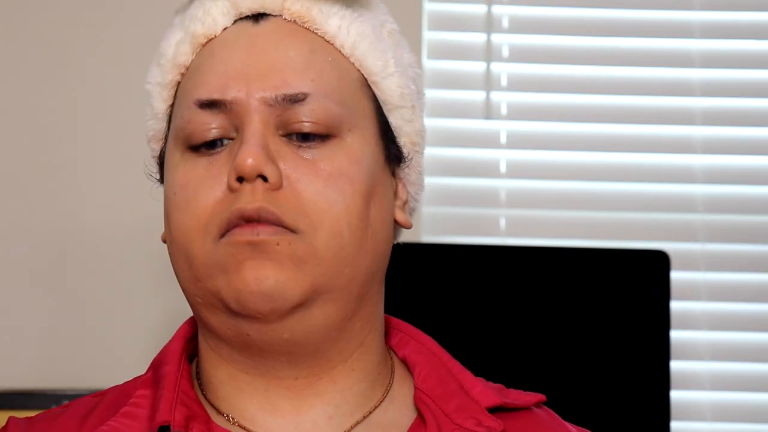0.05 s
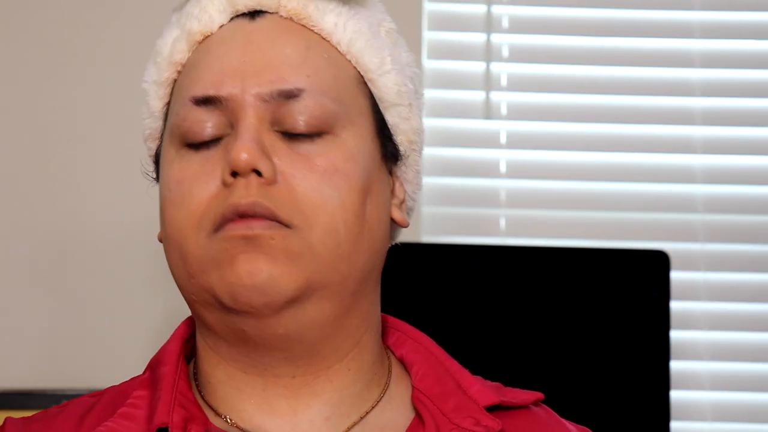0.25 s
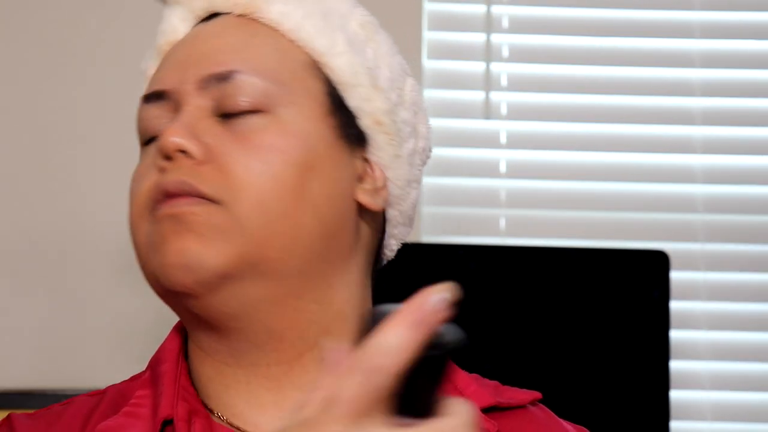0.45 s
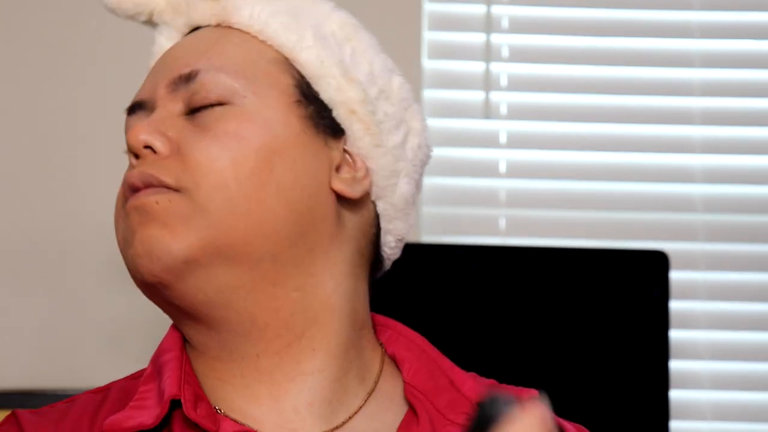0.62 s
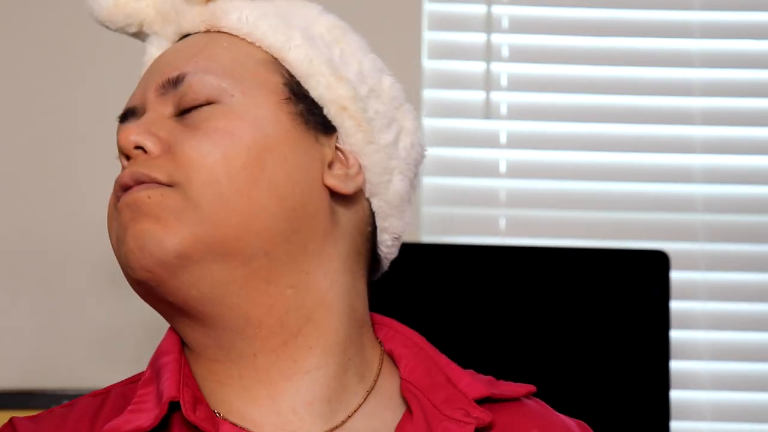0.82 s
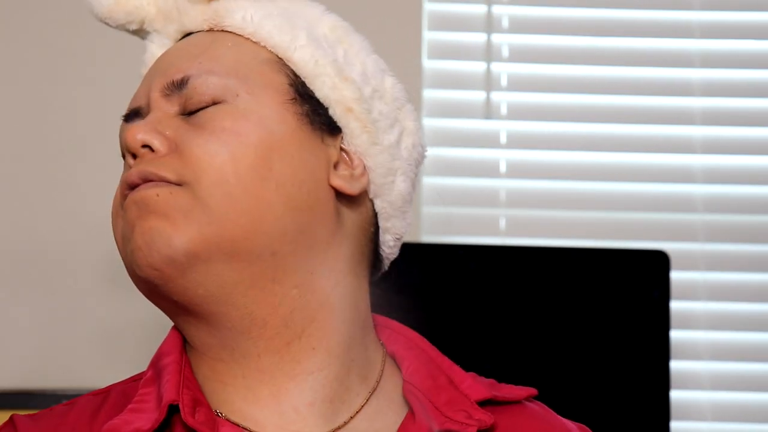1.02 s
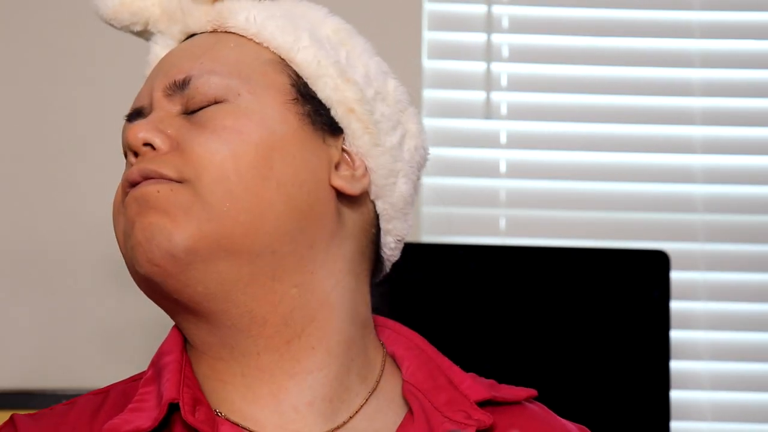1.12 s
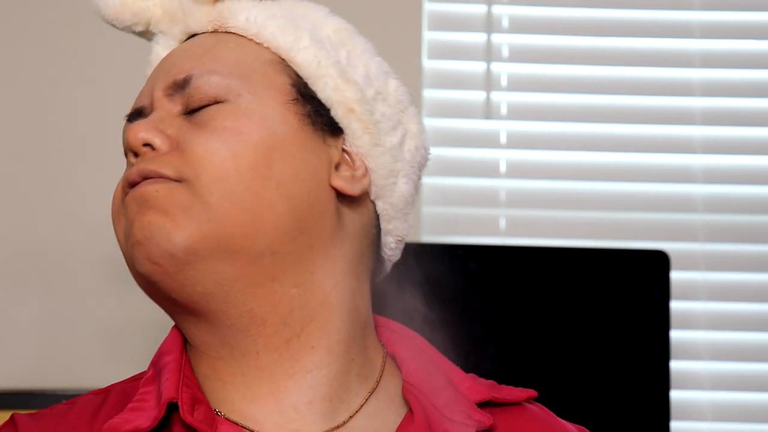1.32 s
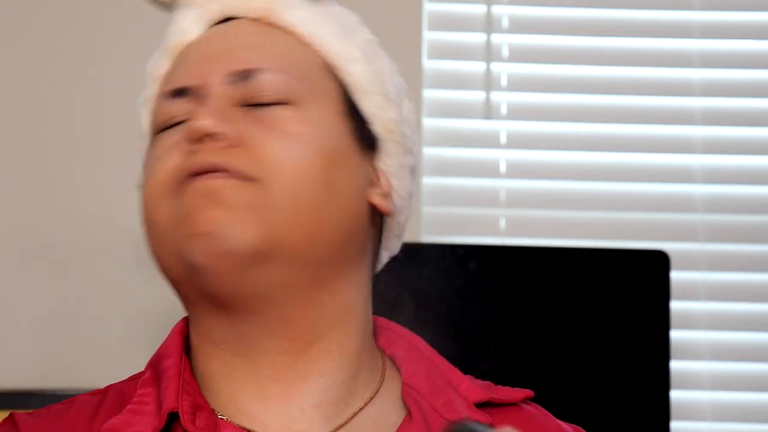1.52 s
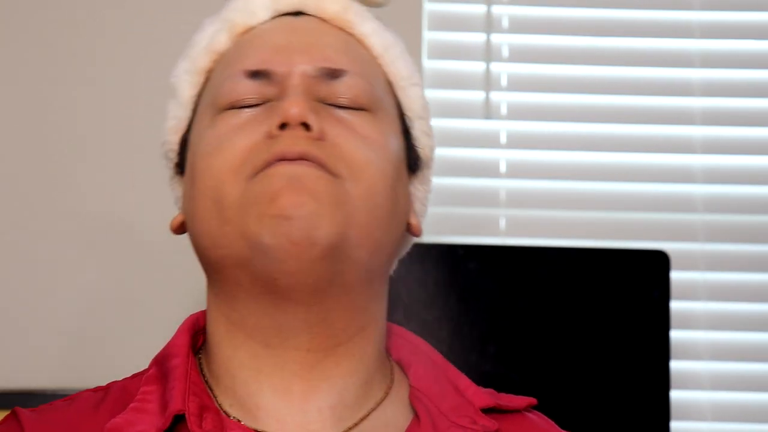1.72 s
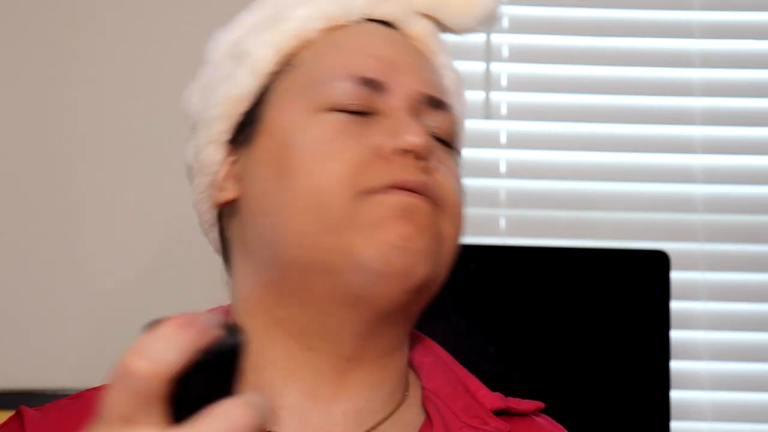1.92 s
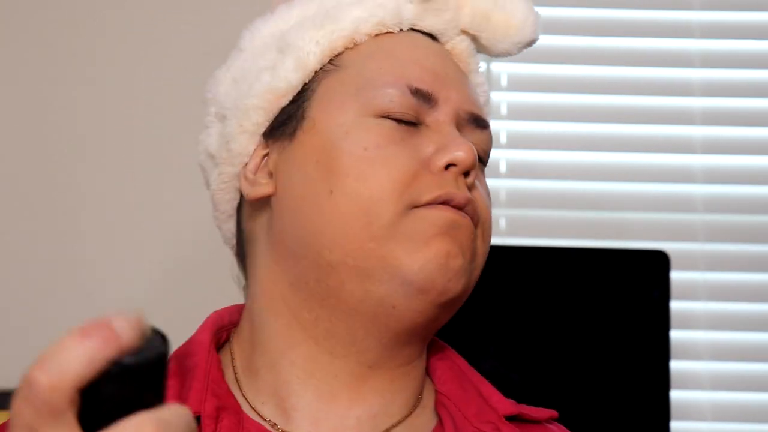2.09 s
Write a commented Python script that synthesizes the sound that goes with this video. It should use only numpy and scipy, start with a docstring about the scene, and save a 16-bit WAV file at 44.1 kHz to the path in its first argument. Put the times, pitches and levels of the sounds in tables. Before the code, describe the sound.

A plastic pump bottle sprays mist at close range in a small quiet room. Its cap pops off sharply at about 0.15 seconds, and light hollow knocks follow from 0.6 seconds. Four short hissing spritzes come at about 1.0, 1.3, 1.6 and 2.0 seconds, each starting with a pump click. Between them the bottle knocks and the liquid swishes softly, over a faint background hum.

```python
"""A plastic pump bottle sprays four times at close range in a small quiet room, after its cap snaps off.
Before each spray, knocks excite the hollow body's damped modes and the liquid swishes; the pump clicks
down, and turbulent flow through the nozzle hisses out as mist. The plastic ticks and squeaks faintly.
Near surfaces reflect the impacts within milliseconds; a faint hum and hiss lie underneath."""
import sys
import numpy as np
from scipy import signal
from scipy.fft import rfft, irfft, next_fast_len
from scipy.io import wavfile
from scipy.ndimage import map_coordinates

SR = 44100
rng = np.random.default_rng(int(sys.argv[2]) if len(sys.argv) > 2 else 0)


def generate_wav(signal):
    """Clip the signal to [-1, 1] and save it as 16-bit WAV at the path in sys.argv[1]."""
    frames = np.transpose(np.atleast_2d(signal))
    scaled = np.clip(frames, -1, 1) * 32767
    pcm = np.round(scaled).astype(np.int16)
    wavfile.write(sys.argv[1], SR, pcm)


N = 94815

# coherence of noise from the bottle, and of the diffuse field (frequency [Hz], left-right correlation [1])
NEAR_COHERENCE = [(500, 0.34), (3000, 0.65), (12000, 0.089)]
DIFFUSE_COHERENCE = [(300, 1), (800, 0.66), (2000, 0.1), (5000, 0.019)]


def mist():
    """Atomisation: the nozzle spits, then turbulent flow breaks up the liquid with a broadband hiss."""
    # bursts of flow (peak time [s], rise [s], fall [s], level [dB], treble tilt [dB/octave])
    puffs = [(1.065, 0.031, 0.06, -39.5, 4.5), (1.39, 0.037, .055, -34, 5),
             (1.712, 0.039, 0.046, -36.5, 4.5), (2.035, 0.046, 0.052, -38, 4.5)]
    spits = [(1.014, .003, 0.029, -37, -16), (1.337, 0.0032, 0.0098, -41, 2),
             (1.638, 0.0038, 0.0068, -47, -6), (1.957, .003, 0.0045, -53, 2)]
    # their spectra before the tilt (frequency [Hz], relative density [dB])
    puff_spectrum = [(200, -25), (500, 2), (1000, -2), (1500, -4), (2000, -1.5), (3060, 1.5), (4500, -1),
                     (6500, -3.5), (8000, -4), (10400, -8), (13000, -15.5), (16000, -21)]
    spit_spectrum = [(100, -61), (1000, -33.5), (5500, -13), (6600, 0), (7200, 2), (8200, -3), (9500, -8),
                     (16000, -28)]
    # coherence of the spray (frequency [Hz], left-right correlation [1])
    coherence = [(400, 0.59), (2400, 0.59), (6000, 0.48), (14000, 0.22)]
    # stereo balance of the spray (frequency [Hz], left over right [dB])
    balance = [(60, 0.5), (180, -1), (550, 4), (1650, -3.5), (4970, -0.5), (15000, 1)]
    hiss = swells(puffs, puff_spectrum, coherence, flutter_db=1.67, flutter_hz=300)
    hiss += swells(spits, spit_spectrum, NEAR_COHERENCE, flutter_db=-2, flutter_hz=500)
    return filtered(hiss, lambda hz: amp(along(balance, hz) / 2 * np.array([[1], [-1]])))


def bottle():
    """Impact excitation: knocks and pump strokes each give a thump, a click and a hollow modal ring."""
    # blows (time [s], gain [dB], thump frequency [Hz], click gain [dB], ring gain [dB], mode ratio [1])
    knocks = [(.6142, -39, 1230, 0, 2, 0.93), (.6892, -25, 750, -6, 1.5, .92),
              (.7524, -19.5, 820, -3.5, 0, 0.99), (.9179, -17, 844, 3.5, -1.5, 1.08),
              (.9471, -13.5, 737, -8, -7, 0.88), (1.1997, -17, 890, 8, 1.5, 0.97),
              (1.2367, -17, 704, -1, -16, 0.33), (1.3105, -31.5, 915, 13, 5, 1.2),
              (1.5441, -15.5, 896, 0, -0.5, 1), (1.5793, -17, 740, -24, 0, 0.87),
              (1.8275, -31, 1080, 5, 5.5, 1.27), (1.8341, -15.5, 827, -4, -6, 0.89),
              (1.8683, -16, 685, -1, -10, 0.33)]
    presses = [(1.0046, -17, 930, 7.5, 0, 0.92), (1.3159, -18, 860, 6.5, 3.5, 0.88),
               (1.6290, -21, 654, 10, 5, 0.86), (1.9482, -16, 524, 6.5, -1.5, 0.9)]
    # body modes, whose pitch shifts with the liquid (frequency [Hz], relative level [dB], T60 [s])
    modes = [(444, -44, 0.094), (546, -29, .07), (648.8, -17.5, 0.08), (711, -11, 0.034), (835, -33, 0.034),
             (1080, -30, 0.02), (1546, -18, 0.037), (3180, -23.5, 0.019)]
    t, out = hit_time(), np.zeros((2, N))
    low_cut = signal.butter(2, 280, "high", fs=SR, output="sos")
    attack = 1 - np.exp(-t / .0008)
    for blows, thump_t60 in ((knocks, .0081), (presses, .0061)):
        for s, db, hz, click_db, ring_db, ratio in blows:
            thump = amp(7.5) * np.sin(2 * np.pi * hz * t) * fade(t, thump_t60)
            body = ring([(f * ratio, level, t60) for f, level, t60 in modes], scatter_db=1.5)
            hollow = signal.sosfilt(low_cut, (thump + amp(ring_db) * body) * attack)
            add(out, s, in_room(-amp(db) * hollow, room_db=-9, walls_db=-3.5))
            add(out, s, in_room(-amp(db + click_db + 7.5) * contact(), room_db=-8.5, walls_db=-10))
    return out


def contact():
    """A brief contact has a broad spectrum: a sharp plastic click with a little grit behind it."""
    # spectrum of the contact (frequency [Hz], relative level [dB])
    spectrum = [(60, -26), (200, -30), (600, -16.5), (1300, 7.5), (2100, -3.5), (2900, 2), (3800, -5.5),
                (4500, -8), (5600, -16.5), (7500, -8), (9500, -11), (12000, -22), (16000, -36)]
    t = hit_time()
    grit = amp(-24.5) * noise(spectrum, NEAR_COHERENCE, len(t))
    return (click(spectrum) + grit) * fade(t, t60=.017)


def cap():
    """Sudden release: the cap scrapes over its rim and pops free, exciting its modes and the room."""
    # broad resonances of the cap (frequency [Hz], relative level [dB])
    spectrum = [(60, -49), (200, -26), (450, -6.5), (850, -20.5), (1150, -1), (1350, -6), (1570, -4),
                (1800, -8), (2050, 2), (2350, -2), (2720, 8), (3150, -7.5), (3600, 5), (4150, -9),
                (7000, -12), (9200, -14.5), (11000, -15), (16000, -50)]
    # coherence of the scrape (frequency [Hz], left-right correlation [1])
    coherence = [(500, 0.86), (1500, 1), (3000, 0.25), (12000, .1)]
    # low modes of the cap and its air (frequency [Hz], level [dB], T60 [s])
    modes = [(466, -36, 0.043), (920, -31, 0.036), (1154, -19.5, 0.026), (1560, -13, 0.02)]
    # reverberation of the pop (frequency [Hz], relative density [dB])
    tail_spectrum = [(120, -43), (200, -33), (347, -43), (401, -32), (569, -11), (1560, -5), (1910, -10.5),
                     (2610, 1), (3250, -13.5), (3690, -6), (5940, -12), (10700, -16), (16000, -30)]
    # its decay (frequency [Hz], T60 [s])
    tail_t60 = [(300, 0.43), (2000, 0.3), (3200, 0.32), (4600, 0.44), (6000, 0.32), (14000, 0.23)]
    pop_s, balance_db = .1503, -.4
    t = np.arange(N) / SR - pop_s
    scrape_envelope = amp(-6.5) * fade(np.abs(t), t60=.008) * (t > -.004)
    out = scrape_envelope * noise(spectrum, coherence, N)
    add(out, pop_s, -amp(13) * click(spectrum))
    attack = 1 - fade(hit_time(), t60=.0033)
    add(out, pop_s - .0018, ring(modes, scatter_db=1) * attack)
    out = in_room(out, room_db=-14, walls_db=-5.5)[:, :N]
    add(out, pop_s, amp(-24) * reverberation(tail_spectrum, tail_t60, onset_s=.0092))
    return out * amp([[balance_db / 2], [-balance_db / 2]])


def ticks():
    """Heavily damped transients: the plastic pump head ticks under the finger."""
    # ticks (time [s], relative level [dB])
    events = [(0.8933, -34.5), (0.8994, -36), (0.925, -25.5), (1.0118, -19), (1.153, -33), (1.177, -26.5),
              (1.2435, -39), (1.3222, -29), (1.635, -24), (1.954, -19.5)]
    # spectrum of a tick (frequency [Hz], relative density [dB])
    spectrum = [(200, -35), (1000, -14), (3000, -3), (5500, -7), (7200, 9), (9000, -3.5), (12000, -22),
                (16000, -24)]
    t, out = hit_time(), np.zeros((2, N))
    for s, db in events:
        tick = noise(spectrum, NEAR_COHERENCE, len(t)) * fade(t, t60=.01)
        add(out, s, in_room(amp(db - 5.5) * tick, room_db=-8.5, walls_db=-10))
    return out


def liquid():
    """Unsteady flow modulates noise: the liquid swishes and crackles around the knocks."""
    # swishes (peak time [s], rise [s], fall [s], level [dB], treble tilt [dB/octave])
    swishes = [(.72, 0.011, 0.016, -45.5, -9.5), (.752, 0.027, 0.023, -52, 3), (.947, 0.017, .02, -41, -1),
               (1.196, 0.0096, .025, -39.5, 1.5), (1.245, 0.018, .018, -43, 0.5),
               (1.582, 0.029, 0.021, -43, -0.5), (1.875, .014, 0.02, -39, 1.5)]
    # their spectrum before the tilt (frequency [Hz], relative density [dB])
    spectrum = [(100, -57), (350, -36), (900, -2), (2000, 4.5), (2800, -4.5), (3700, 0), (5000, -4.5),
                (8200, 2), (12000, -7.5), (16000, -16)]
    return swells(swishes, spectrum, NEAR_COHERENCE, flutter_db=3, flutter_hz=230)


def squeaks():
    """Narrow-band noise is heard as pitch: the sliding plunger whistles briefly."""
    # squeaks (time [s], level [dB], centre frequency [Hz])
    events = [(0.921, -47, 3350), (0.936, -44, 3150), (1.861, -48, 3800), (1.875, -44.5, 3780)]
    swell_s, skirt_fraction = .0062, .112
    out = np.zeros((2, N))
    for s, db, hz in events:
        band = [(hz * (1 - skirt_fraction), -50), (hz, 0), (hz * (1 + skirt_fraction), -50)]
        out += swells([(s, swell_s, swell_s, db, 0)], band, DIFFUSE_COHERENCE, flutter_db=0, flutter_hz=200)
    return out


def in_room(x, room_db, walls_db):
    """Convolution with the room's impulse response: direct sound, early reflections, diffuse tail."""
    # reflections from near surfaces (delay [s], left gain [1], right gain [1])
    walls = [(.0046, 0.9, 0.55), (.0064, 0.16, .36), (.0083, 0.096, -0.051), (.0112, .1, 0.2)]
    # spectrum of the tail (frequency [Hz], relative density [dB])
    spectrum = [(150, -10), (600, 11), (1500, 4.5), (3000, 6), (7000, 1.5), (15000, -7.5)]
    # reverberation time (frequency [Hz], T60 [s])
    t60s = [(200, 0.33), (800, 0.19), (2000, 0.28), (5000, 0.3), (14000, 0.44)]
    tail = reverberation(spectrum, t60s, onset_s=.012)
    response = amp(room_db) * unit(tail) / np.sqrt(tail.shape[1])
    response[:, 0] += 1
    for delay, left, right in walls:
        response[:, round(delay * SR)] += amp(walls_db) * np.array([left, right])
    return signal.fftconvolve(np.atleast_2d(x), response, axes=1)


def reverberation(spectrum, t60s, onset_s):
    """A diffuse field builds up, then decays exponentially, each frequency at its own rate."""
    t = hit_time()
    hz, s, bands = signal.stft(noise(spectrum, DIFFUSE_COHERENCE, len(t)), SR, nperseg=256)
    _, tail = signal.istft(bands * fade(s, along(t60s, hz)[:, None]), SR)
    build_up = 1 - np.exp(-(t / onset_s) ** 2)
    return tail[:, :len(t)] * build_up


def room_tone():
    """Stationary background: a continuous hiss spectrum with discrete lines of low hum."""
    # spectrum of the hiss (frequency [Hz], relative density [dB])
    spectrum = [(12, -90), (20, -3.5), (120, -8.5), (177, -11.5), (262, -6.5), (357, -14.5), (499, -11.5),
                (607, -16), (1120, -16), (1570, -19), (1860, -17.5), (2080, -21.5), (6540, -26.5),
                (14700, -35), (16000, -46)]
    # its coherence (frequency [Hz], left-right correlation [1])
    coherence = [(30, 0.87), (60, 0.89), (180, 0.6), (550, 0.59), (1650, 0.13), (15000, 0.073)]
    # hum tones (frequency [Hz], rms level [dB])
    tones = [(32.5, -61), (60, -79.5), (120, -64.5)]
    t = np.arange(N) / SR
    hum = sum(amp(db) * np.sqrt(2) * np.sin(2 * np.pi * (hz * t + rng.random())) for hz, db in tones)
    return amp(-51.5) * noise(spectrum, coherence, N) + hum


def swells(rows, spectrum, coherence, flutter_db, flutter_hz):
    """Amplitude modulation: noise swells and fades on Gaussian flanks, fluttering with the flow."""
    t, out = np.arange(N) / SR, np.zeros((2, N))
    for s, rise, fall, db, tilt_db in rows:
        hiss = unit(filtered(noise(spectrum, coherence, N), lambda hz: amp(tilt_db * np.log2(hz + 1000))))
        flutter = map_coordinates(rng.standard_normal(N // 4), [t * flutter_hz], order=1)
        envelope = np.exp(-.5 * ((t - s) / np.where(t < s, rise, fall)) ** 2)
        out += amp(db + flutter_db * flutter) * envelope * hiss
    return out


def ring(modes, scatter_db):
    """Superposition of damped modes, struck a little differently each time."""
    t = hit_time()
    return sum(amp(db + scatter_db * rng.standard_normal()) * np.sin(2 * np.pi * hz * t) * fade(t, t60)
               for hz, db, t60 in modes)


def click(spectrum):
    """Minimum-phase impulse: folding the cepstrum makes the given spectrum causal."""
    n = SR // 2
    cepstrum = irfft(np.log(amp(along(spectrum, np.fft.rfftfreq(n, 1 / SR)))), n)
    cepstrum[1:n // 2] *= 2
    cepstrum[n // 2 + 1:] = 0
    return irfft(np.exp(rfft(cepstrum)), n)


def noise(spectrum, coherence, size):
    """Partly coherent stereo noise of rms 1: the mid-to-side ratio sets the correlation."""
    def response(hz):
        angle = np.arccos(np.clip(along(coherence, hz), -1, 1)) / 2
        return amp(along(spectrum, hz)) * [np.cos(angle), np.sin(angle)]
    mid, side = filtered(rng.standard_normal((2, size)), response)
    return unit(np.array([mid + side, mid - side]))


def filtered(x, response):
    """Linear filtering: the spectrum of x times a frequency response."""
    n = x.shape[-1]
    padded = next_fast_len(n + SR // 2)
    return irfft(rfft(x, padded) * response(np.fft.rfftfreq(padded, 1 / SR)), padded)[..., :n]


def along(points, hz):
    """Interpolation of (frequency [Hz], value) points on a logarithmic axis."""
    frequencies, values = np.transpose(points)
    return np.interp(np.log(hz + 1), np.log(frequencies + 1), values)


def add(out, s, x):
    """Superposition of x on out from time s."""
    start = round(s * SR)
    out[:, start:start + x.shape[-1]] += x[..., :N - start]


def hit_time():
    """Half-second time axis of one impact."""
    return np.arange(SR // 2) / SR


def fade(t, t60):
    """Exponential decay by 60 dB in t60 seconds."""
    return np.exp(-np.log(1000) * t / t60)


def amp(db):
    """Amplitude ratio of a level in decibels."""
    return 10 ** (np.asarray(db) / 20)


def unit(x):
    """Normalisation to rms 1."""
    return x / np.sqrt(np.mean(x ** 2) + 1e-20)


def scene():
    """Linear superposition: the pressures of all sources add."""
    return cap() + bottle() + ticks() + mist() + liquid() + squeaks() + room_tone()


def record(dry):
    """Hard clipping at full scale, then band limiting to 16 kHz."""
    return filtered(np.clip(dry, -1, 1), lambda hz: hz < 16000)


dry = scene()
out = record(dry)
generate_wav(out)
```